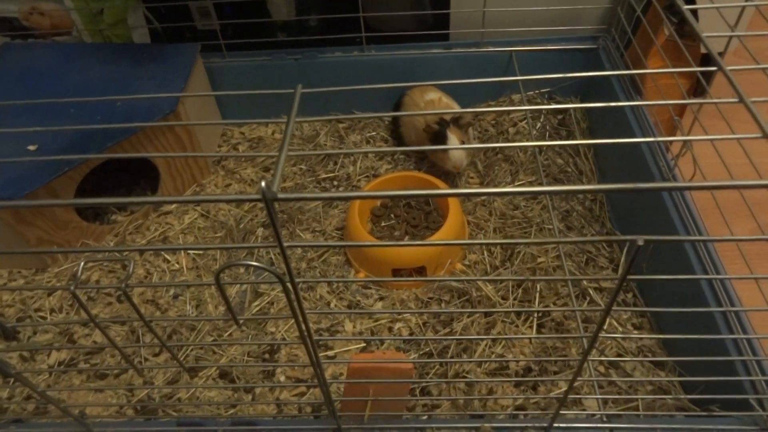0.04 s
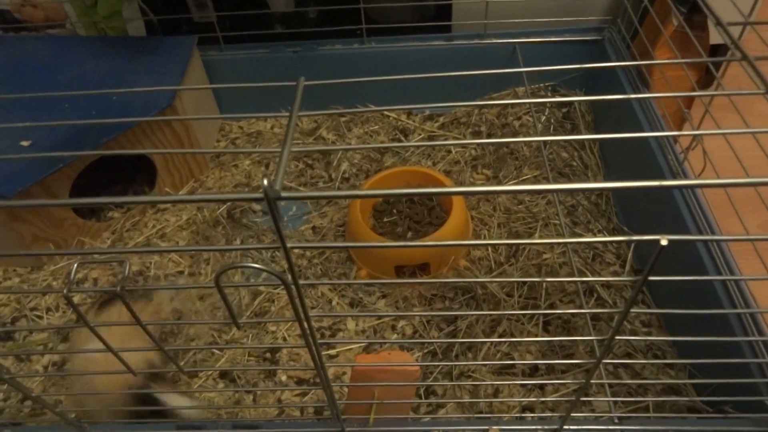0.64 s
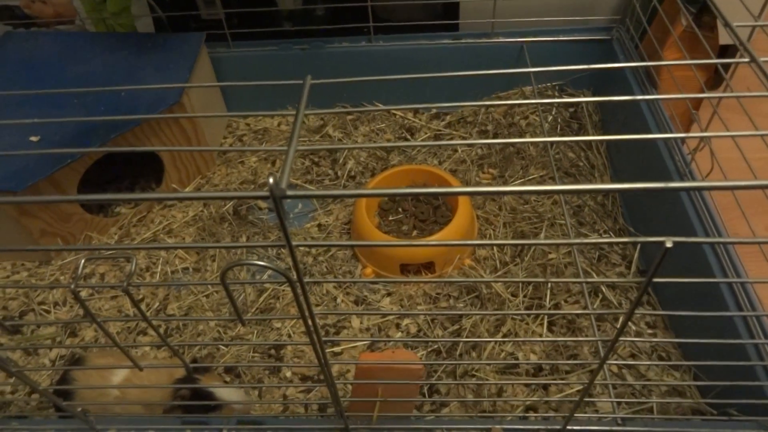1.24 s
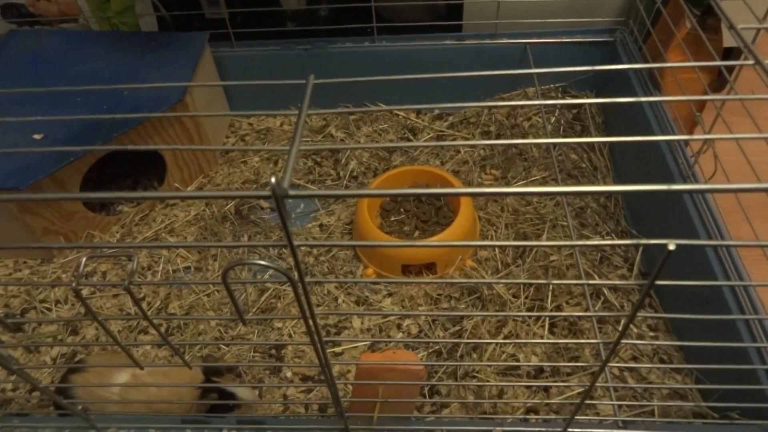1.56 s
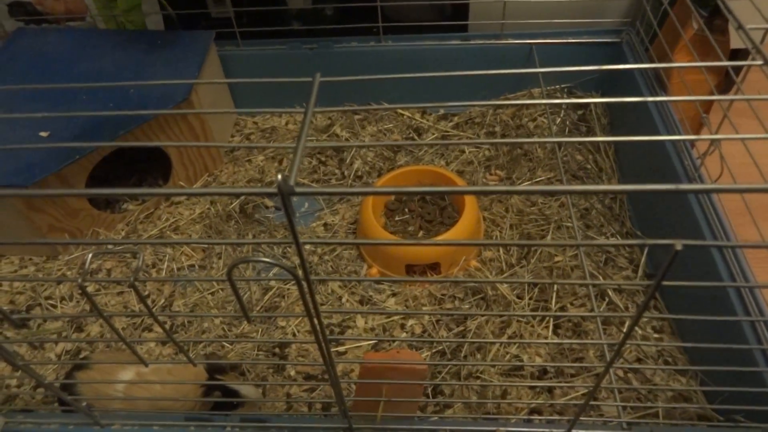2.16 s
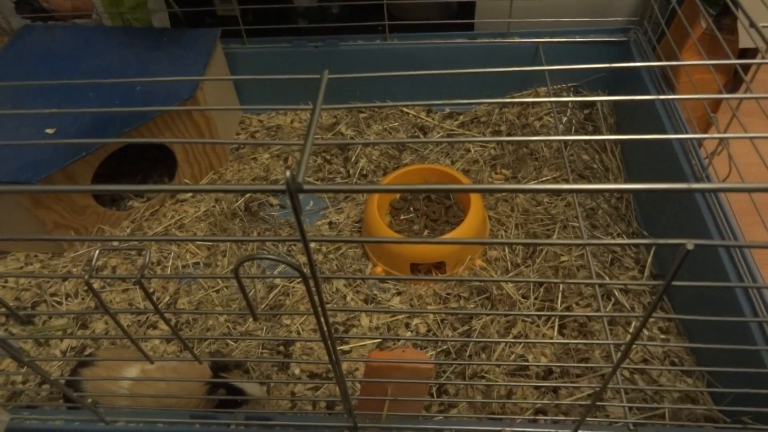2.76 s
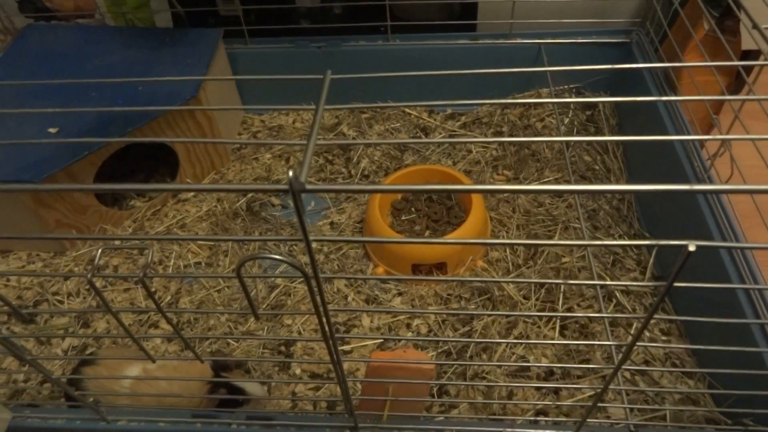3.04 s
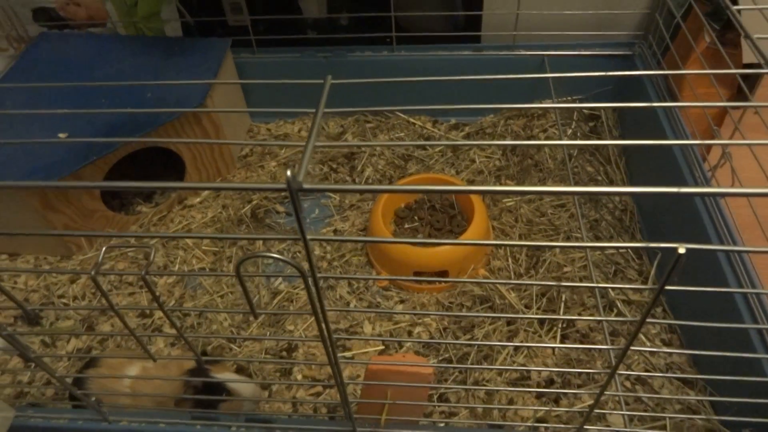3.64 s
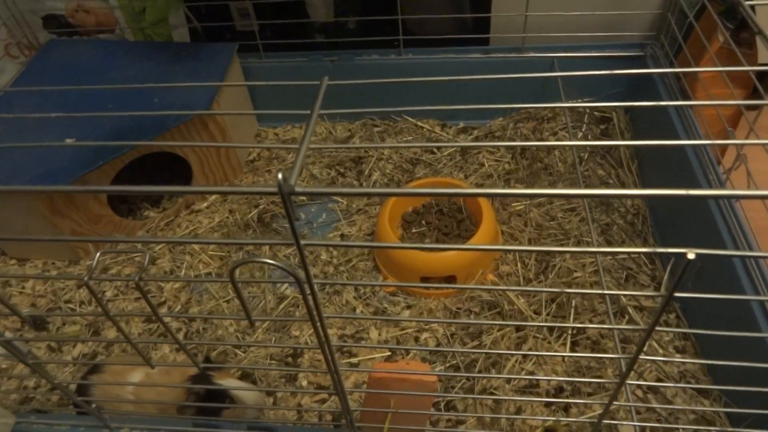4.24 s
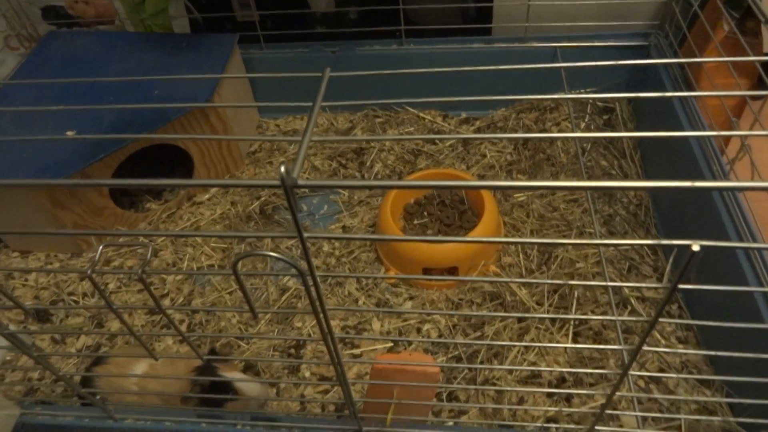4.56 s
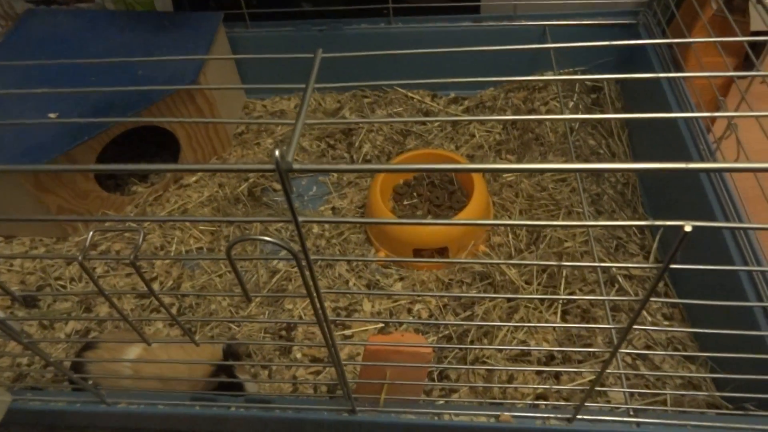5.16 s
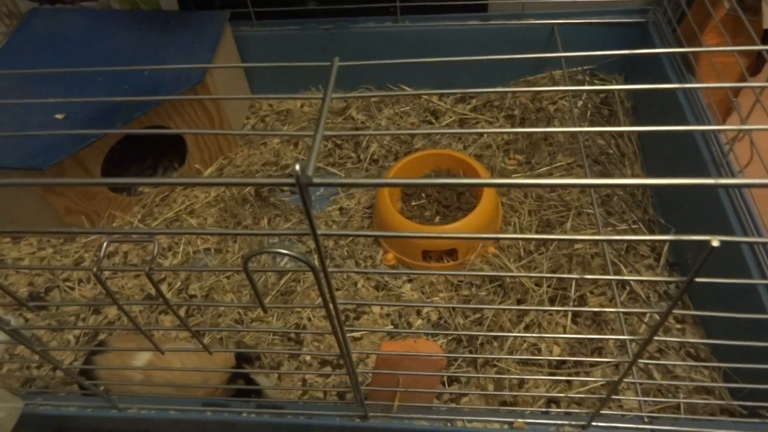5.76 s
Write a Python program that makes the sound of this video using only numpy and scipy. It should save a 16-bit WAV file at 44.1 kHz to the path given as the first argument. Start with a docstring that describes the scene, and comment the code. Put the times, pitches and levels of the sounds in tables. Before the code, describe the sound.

Close up in a quiet small room, a crisp burst of rustling straw and quick, hollow paw thumps opens the scene as a guinea pig runs across its plastic cage tray. After about a second it stops, and low room hiss and hum remain. Toward the end, single stalks tick and snap, with one muffled bump on the microphone and a tiny stir of bedding before a final sharp crack.

```python
"""Guinea pig in straw

A guinea pig bolts across the straw bedding of its cage, close by, and then sits still.
Each stride crushes a swarm of stalks, and its paws drum on the plastic tray under them.
Later come a dull handling bump, a small shift and single snapping stalks, over a room's hiss and hum."""
import sys
import numpy as np
from scipy import signal
from scipy.fft import rfft, irfft
from scipy.io import wavfile
from scipy.ndimage import uniform_filter1d

SR = 44100
rng = np.random.default_rng(int(sys.argv[2]) if len(sys.argv) > 2 else 0)


def store_wav(level_fs):
    """Save 16-bit WAV to argv[1]."""
    pcm = np.round(np.clip(np.atleast_2d(level_fs), -1, 1) * 32767)
    wavfile.write(sys.argv[1], SR, pcm.T.astype(np.int16))


N = 265041
TIME = np.arange(N) / SR


# Pushes into the straw. Each row: start in seconds, rise in seconds, hold in seconds, level in dB,
# weight on the tray in dB relative to that level, share of packed bedding from 0 to 1.
STRIDES = [(0.0, 0.066, 0.097, -59.5, -5, 0.88), (0.138, 0.032, 0.053, -34, -9, 0.01),
           (0.266, .028, .03, -46, -3.5, 0), (0.307, 0.019, 0.061, -33, -9, 0.01),
           (0.375, 0.008, 0.06, -29.5, -2.5, 0.11), (0.502, 0.06, 0.029, -30.5, -7, 0.03),
           (0.699, 0.0079, 0.028, -47, -6, 0.02), (0.749, 0.0023, 0.011, -38, -8, 0.13),
           (0.851, .003, 0.011, -44.5, -7, 0.99), (5.428, 0.13, .005, -58, -10, 0)]
# Paws striking loose straw. Each row: start in seconds, level in dB.
PAW_STRIKES = [(0.317, -38), (0.337, -31), (0.509, -33), (0.533, -33.5), (0.591, -31.5), (0.632, -32.5),
               (0.648, -37), (0.744, -27.5), (5.534, -54), (5.549, -52), (5.579, -58)]


def scurry(paw_rise_s=0.0034, paw_hold_s=0.0022, paw_weight_db=-14, spring_back_db=-4.5):
    """Strides and paws crush loose straw, crunch packed bedding and scrape stalks on the tray."""
    loose_power, packed_power = np.zeros(N), np.zeros(N)
    for start, db in PAW_STRIKES:
        attack = np.clip((TIME - start) / paw_rise_s, 0, 1)
        release = fade(TIME - start - paw_rise_s - paw_hold_s, t60=0.068)
        loose_power += (undb(db) * attack * release) ** 2
    tray_power = loose_power * undb(paw_weight_db) ** 2
    for start, rise, hold, db, weight_db, packed in STRIDES:
        swell = np.clip((TIME - start) / rise, 0, 1) ** 0.78
        after = TIME - start - rise - hold
        # the straw quietens after the push, but flattened stalks go on rising for a while
        settle = np.maximum(fade(after, t60=0.25), undb(spring_back_db) * fade(after, t60=0.42))
        push = undb(db) * swell * settle
        loose_power += (1 - packed) * push ** 2
        packed_power += packed * push ** 2
        tray_power += (push * undb(weight_db)) ** 2
    rustle = loose_straw() * np.sqrt(loose_power)
    scrape = tray_scrape() * np.sqrt(tray_power)
    crunch = packed_bedding() * np.sqrt(packed_power)
    return rustle + crunch + scrape


# The bright colour of crushed straw. Each row: frequency in Hz, gain in dB.
STRAW_EQ = [(60, -37), (130, -15), (300, -10), (1200, -8), (2000, -9.5), (3000, -1.5), (3600, -4.5),
            (4400, -5.5), (5300, -3), (7500, -1), (11000, 3.5), (14000, 2), (16000, -6.5)]


def loose_straw():
    """A crisp rustle: each fracture sets its neighbours rubbing for an instant, and freed stalks twang."""
    fractures = crackle(per_s=4000, spread_db=-0.5)
    stirred = signal.fftconvolve(fractures ** 2, fade(TIME[:SR // 50], t60=0.039) ** 2)[:N]
    rubbing = unit(rng.standard_normal(N) * np.sqrt(np.abs(stirred)))
    return unit(colour(fractures + undb(-0.5) * rubbing + undb(-2) * twangs(), STRAW_EQ))


def twangs(count=9000, low_hz=1500, high_hz=15500, cycles=45, spread_db=4):
    """Stalks that spring free ring for some cycles, each at its own pitch."""
    out, t = np.zeros(N), TIME[:SR // 60]
    for when, pitch, chance in rng.random((count, 3)):
        hz = low_hz + (high_hz - low_hz) * pitch
        size_db = spread_db * min(-np.log(1 - chance), 3)
        # high stalks ring shorter and start stronger, so pitch does not set the energy
        ring = np.sqrt(hz) * np.sin(2 * np.pi * hz * t) * fade(t, cycles / hz)
        add(out, when * TIME[-1], undb(size_db) * ring)
    return unit(out)


def packed_bedding():
    """Fractures inside packed bedding come out as a dull crunch."""
    return unit(band(crackle(per_s=2500, spread_db=2.0), 1700, 3700))


def crackle(per_s, spread_db):
    """Tiny fractures: clicks of uneven size at random moments."""
    size = undb(spread_db * np.minimum(rng.exponential(size=N), 4))
    breaks = rng.random(N) < per_s / SR
    return unit(breaks * size * rng.choice([-1, 1], N))


# Resonances of the plastic tray and cage. Each row: pitch in Hz, width in Hz, relative level in dB.
TRAY_MODES = [(231, 29, -11.5), (283.4, 6.9, 1.5), (321, 7.9, 2), (362, 25, 0), (394.4, 17, 1),
              (468.6, 23, -0.5), (524.3, 21, 3), (581, 23, -0.5), (680, 94, -2), (780, 40, -6),
              (860, 94, -4), (1025, 160, -5), (1108, 55, -4), (1210, 130, -4.5), (1440, 45, -9.5),
              (1564, 21, -12)]


def tray_scrape():
    """Stalks scraping under the animal's weight set the hollow tray ringing."""
    scrapes = crackle(per_s=3000, spread_db=3.0)
    body = sum(undb(db) * resonate(scrapes, hz, width) for hz, width, db in TRAY_MODES)
    return unit(band(body, 241, 3100))


# Dull thumps: paws landing on the tray during the run, and a camera-handling bump near 4.8 s.
# Each row: start in seconds, level in dB, favoured pitch in Hz, seconds to die away by 60 dB.
THUMPS = [(0.204, -27, 460, 0.2), (0.218, -22.5, 920, 0.04), (0.317, -39.5, 347, 0.1),
          (0.381, -28.5, 400, 0.1), (0.405, -27, 610, 0.14), (0.440, -27, 1190, 0.069),
          (0.552, -25, 368, 0.13), (0.614, -30.5, 404, 0.059), (0.661, -31.5, 760, 0.031),
          (4.778, -55, 238, 0.28), (4.804, -35.5, 240, 0.037), (5.469, -58, 235, 0.25)]


def thumps(knock_db=-6, knock_t60=0.035, cushion_s=0.00087, reach_octaves=0.14):
    """Each thump rings the modes near its favoured pitch, with a dull knock and a cushioned attack."""
    out, t = np.zeros(N), TIME[:SR // 3]
    mode_hz, _, mode_db = np.transpose(TRAY_MODES)
    attack = 1 - np.exp(-t / cushion_s)
    for start, db, hz, t60 in THUMPS:
        share = undb(mode_db) * np.exp(-0.5 * (np.log2(mode_hz / hz) / reach_octaves) ** 2)
        modes = np.sin(2 * np.pi * (mode_hz[:, None] * t + rng.random((len(TRAY_MODES), 1))))
        ring = share @ modes / np.linalg.norm(share) * fade(t, t60)
        knock = unit(band(rng.standard_normal(len(t)), hz * 0.44, hz * 2)) * fade(t, min(knock_t60, t60))
        add(out, start, undb(db) * (ring + undb(knock_db) * knock) * attack)
    return low_cut(out, hz=150)  # a small tray radiates no deep bass


# Bending modes of a stalk. Each row: multiple of its pitch, relative level in dB.
STALK_MODES = [(.4, -14.5), (0.652, -2.5), (0.999, 8.5), (2.351, -4.5), (3.35, -26)]
# Single stalks breaking. Each row: start in seconds, peak level in dB, stalk pitch in Hz,
# low cut in Hz, high cut in Hz, amount of splintering in dB.
SNAPS = [(0.394, -22, 3530, 900, 15000, -3), (0.404, -22, 4400, 3000, 6000, -8),
         (0.416, -16.5, 4700, 2900, 7000, 3), (0.4372, -20, 4030, 1000, 13000, -8),
         (0.6350, -27, 6200, 2500, 15100, 10), (0.7478, -19, 5800, 1000, 14000, 0),
         (0.751, -19, 3050, 1000, 12000, -7), (0.8536, -25.5, 2550, 505, 4400, 3),
         (0.8628, -31.5, 3120, 1300, 5500, -5), (3.8317, -34.5, 2710, 2400, 4800, -5),
         (3.8851, -43, 2730, 800, 3000, 10), (4.806, -32, 2640, 644, 2570, 7),
         (4.813, -45, 2720, 1000, 3400, 6), (5.0079, -45, 2750, 1000, 4000, 13),
         (5.2407, -38, 4300, 1710, 5500, 6), (5.4149, -38, 2030, 600, 2800, 14),
         (5.5518, -25.5, 2090, 1630, 6900, 10), (5.5552, -30.5, 2000, 1390, 11000, 4),
         (5.5714, -34.5, 2010, 1100, 8000, 12), (5.7582, -36, 3100, 1100, 5000, 12),
         (5.7678, -35.5, 1860, 900, 4500, 17), (5.8267, -14, 4460, 1630, 14100, -4),
         (5.8278, -27, 2890, 1500, 4000, -12)]


def snaps(ring_cycles=26.5, splinter_t60=0.0065, fibres_db=-11, fibres_t60=0.027):
    """A stalk breaks in a burst of splinters and rings briefly; deeper in the bedding it sounds duller."""
    out, t = np.zeros(N), TIME[:SR // 12]
    # after the break itself, the last fibres tear more weakly and for longer
    tearing = np.maximum(fade(t, splinter_t60), undb(fibres_db) * fade(t, fibres_t60))
    for start, db, hz, low_hz, high_hz, splinter_db in SNAPS:
        ring = sum(undb(mode_db) * np.sin(2 * np.pi * hz * ratio * t) * fade(t, ring_cycles / (hz * ratio))
                   for ratio, mode_db in STALK_MODES if hz * ratio < SR / 2)
        splinters = undb(splinter_db) * rng.standard_normal(len(t)) * tearing
        snap = band(ring / 2 + splinters, low_hz, high_hz)
        add(out, start, undb(db) * snap / np.abs(snap).max())
    return out


def place(x, left_db, side_db):
    """A near source off centre; the cage walls scatter a little of it differently to each side."""
    t = TIME[:SR // 20]
    scatter = band(rng.standard_normal(len(t)), 250, 17000) * fade(t, t60=0.018)
    side = undb(side_db) * signal.fftconvolve(x, scatter / np.linalg.norm(scatter))[:N] / 2
    return np.array([x * undb(left_db / 2) + side, x * undb(-left_db / 2) - side])


# How far the left channel leads the right. Each row: frequency in Hz, phase lead in radians.
LEFT_LEAD = [(100, -0.032), (520, 0.29), (1200, 0.27), (2400, 0), (16000, -0.31)]


def mic_ports(x):
    """Sound from one side reaches the two microphone ports out of step."""
    lead = np.interp(np.fft.rfftfreq(N, 1 / SR), *np.transpose(LEFT_LEAD))
    return irfft(rfft(x) * np.exp(1j * np.array([lead, -lead]) / 2), N)


def walls(x, t60=0.62, wet_db=-25, onset_s=0.0041):
    """The small room answers with a weak, dull tail."""
    t = TIME[:SR // 2]
    tail = band(rng.standard_normal((2, len(t))), 140, 6400) * fade(t, t60) * np.minimum(t / onset_s, 1)
    return undb(wet_db) * signal.fftconvolve(x[None], tail / np.linalg.norm(tail[0]), axes=1)[:, :N]


# Colour of the room hiss, at the centre and in the stereo width. Each row: frequency in Hz, gain in dB.
ROOM_MID_EQ = [(30, -21), (85, -18.5), (130, -10.5), (200, -9.5), (320, -7.5), (486, -4.5), (650, -2),
               (860, -2), (1460, -5.5), (1900, -6), (2750, -8), (10000, -15), (16000, -20.5)]
ROOM_SIDE_EQ = [(18, -62), (30, -32), (71, -29), (204, -10.5), (415, -2.5), (486, 0), (913, 0.5),
                (1250, 0.5), (2120, -3.5), (9970, -22.5), (14800, -34), (16000, -45)]
# Narrow, droning bands of room noise. Each row: centre in Hz, width in Hz, level in dB.
DRONE_BANDS = [(485, 43, -74), (716, 35, -77.5), (828.3, 7.2, -72), (944, 25, -71.5), (1914, 160, -73.5)]
# Tones of the room's appliances. Each row: pitch in Hz, level in dB.
HUM_TONES = [(119.5, -79.5), (9119, -92)]


def room_tone(mid_db=-60, side_db=-61, swell_db=3, waver=0.0043):
    """Even hiss from all around, a few bands that swell softly, and a faint hum that wavers in pitch."""
    mid = undb(mid_db) * unit(colour(rng.standard_normal(N), ROOM_MID_EQ))
    side = undb(side_db) * unit(colour(rng.standard_normal(N), ROOM_SIDE_EQ))
    drone = np.zeros((2, N))
    for hz, width, db in DRONE_BANDS:
        noise = resonate(rng.standard_normal((2, N)), hz, width)
        drone += undb(db) * unit(noise * undb(swell_db * wander(seconds=0.071)))
    wavering_time = np.cumsum(1 + waver * wander(seconds=0.045)) / SR
    hum = sum(undb(db) * unit(np.sin(2 * np.pi * hz * wavering_time)) for hz, db in HUM_TONES)
    return np.array([mid + side, mid - side]) + drone + hum


def undb(db):
    """Decibels to gain."""
    return 10 ** (np.asarray(db) / 20)


def unit(x):
    """Scale to rms 1."""
    return x / np.sqrt(np.mean(x ** 2))


def fade(t, t60):
    """Full level until t = 0, then down by 60 dB every t60 seconds."""
    return np.exp(-np.log(1000) * np.maximum(t, 0) / t60)


def wander(seconds):
    """Smooth random drift over the given time, at rms 1."""
    size = max(int(seconds * SR), 1)
    return unit(uniform_filter1d(uniform_filter1d(rng.standard_normal(N), size), size))


def colour(x, points):
    """Equalise a sound along (Hz, dB) points."""
    hz, db = np.transpose(points)
    bins = np.maximum(np.fft.rfftfreq(N, 1 / SR), 1)
    return irfft(rfft(x) * undb(np.interp(np.log(bins), np.log(hz), db)), N)


def resonate(x, hz, width):
    """One resonance, gain 1 at its centre."""
    return signal.lfilter(*signal.iirpeak(hz, hz / width, fs=SR), x)


def low_cut(x, hz, order=2):
    """Roll off the lows."""
    return signal.sosfilt(signal.butter(order, hz, "high", fs=SR, output="sos"), x)


def band(x, low_hz, high_hz):
    """Band-pass, steep below and gentler above."""
    high_cut = signal.butter(2, high_hz, fs=SR, output="sos")
    return signal.sosfilt(high_cut, low_cut(x, low_hz, order=4))


def add(track, start, sound):
    """Mix a sound into a track, start in seconds."""
    first = int(start * SR)
    track[first:first + len(sound)] += sound[:N - first]


def scene():
    """Scurry, thumps and snaps sit slightly left, over the room tone; the snaps get no room tail."""
    movement = scurry() + thumps()
    near_movement = mic_ports(place(movement, left_db=1.0, side_db=-20))
    near_snaps = place(snaps(), left_db=1.0, side_db=-6)
    return near_movement + near_snaps + walls(movement) + room_tone()


def record(dry, top_hz=16000):
    """Thin the deep bass and cut the top steeply."""
    high_cut = signal.ellip(10, 0.2, 70, top_hz, fs=SR, output="sos")
    return signal.sosfilt(high_cut, low_cut(dry, hz=45))


dry = scene()
out = record(dry)
store_wav(out)
```